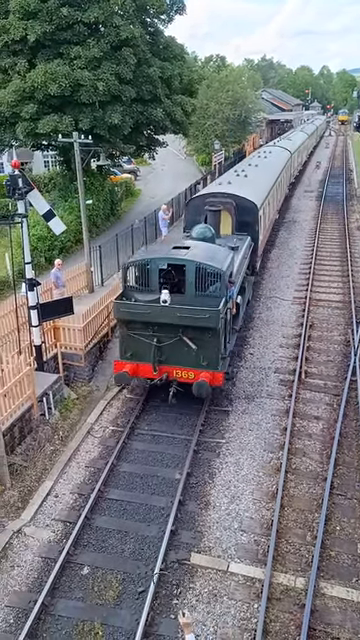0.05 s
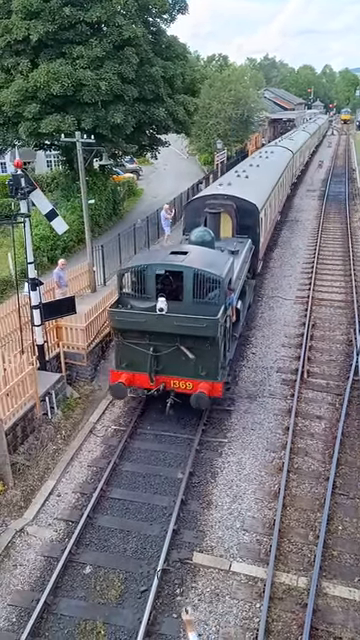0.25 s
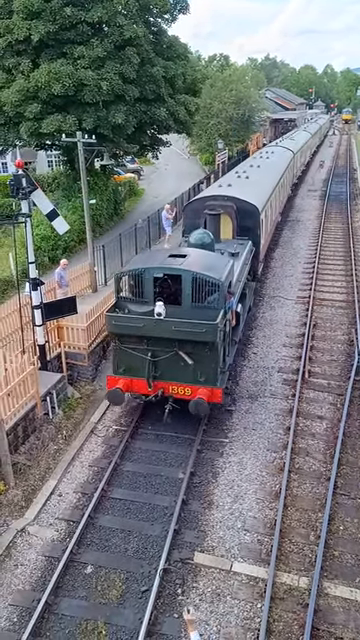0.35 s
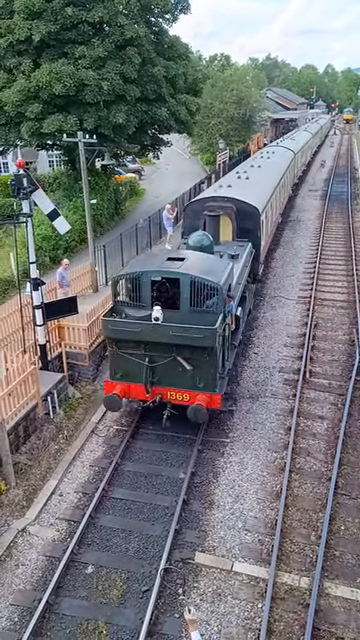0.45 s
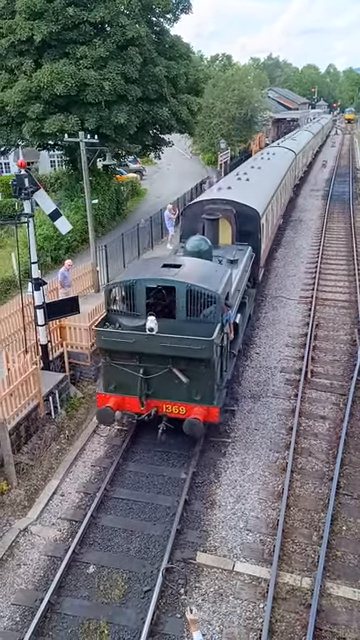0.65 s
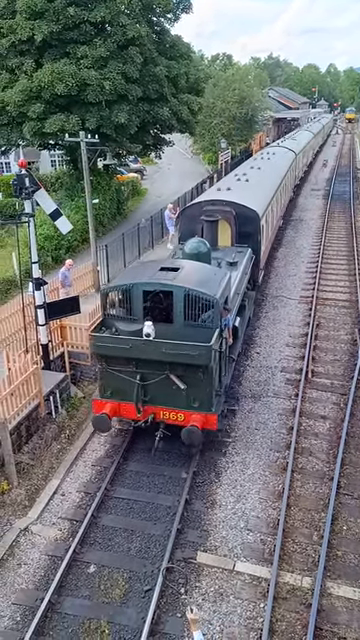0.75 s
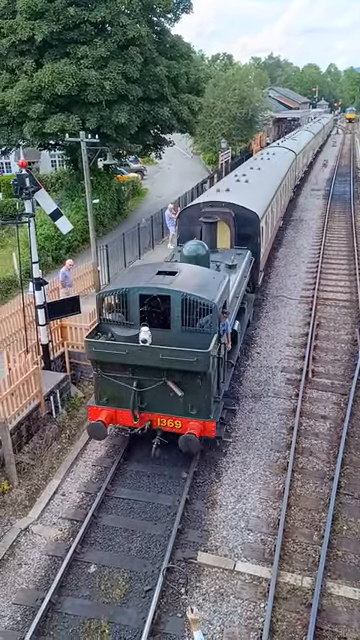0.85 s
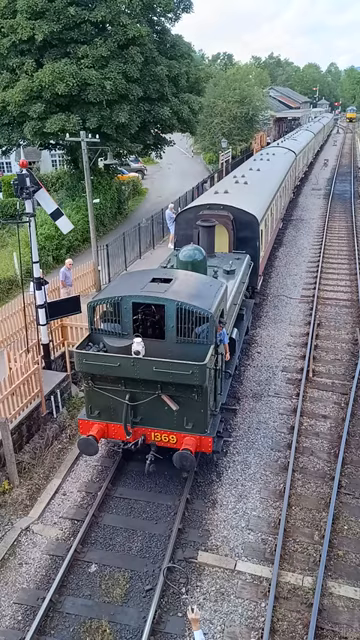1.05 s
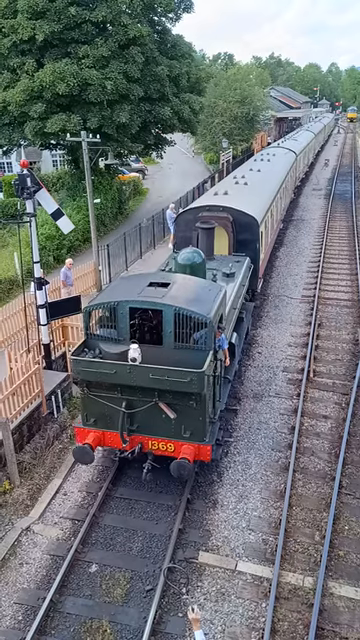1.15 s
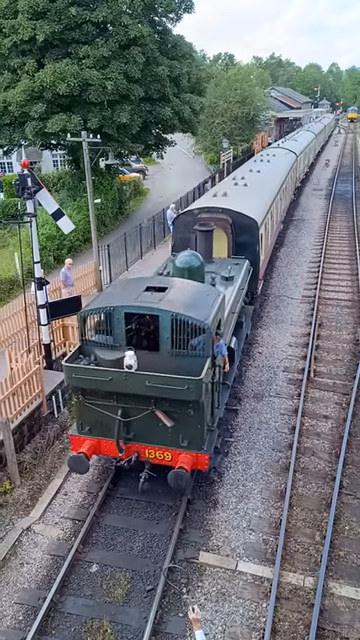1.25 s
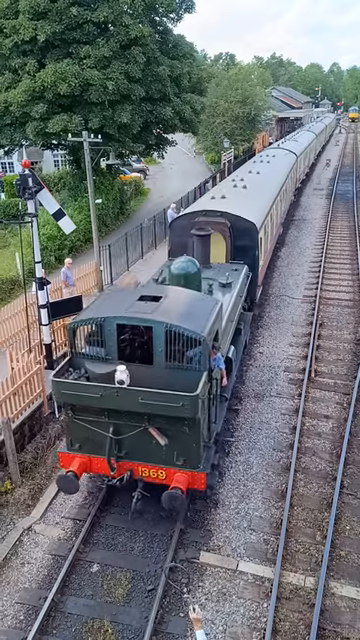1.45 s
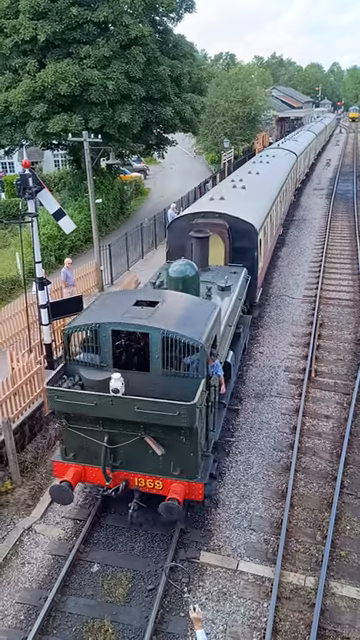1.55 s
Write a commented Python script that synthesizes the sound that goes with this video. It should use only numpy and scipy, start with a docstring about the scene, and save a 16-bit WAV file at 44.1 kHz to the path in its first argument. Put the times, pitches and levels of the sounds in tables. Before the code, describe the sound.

A steam locomotive pulls away with five quick, barking exhaust chuffs, each with a hiss and low boom; steam spits between them, a loose rod clinks, heard outdoors in stereo with slight wind on the microphone.

```python
"""A steam tank engine pulls coaches at about three exhaust chuffs a second, over a faint rumble and rail ringing.
First an earlier boom dies away, a loose rod clinks and a soft puff of wind is heard, mostly on the left.
Then come five chuffs: hoot and hiss, a bark and throb of shaped noise, and a low boom of wavering tones.
Steam leaks and spits between the chuffs, and the rod clinks again; echoes follow the steam sounds.
Near the end the rod clinks loudest, the motion squeaks once and a weaker puff of wind follows."""
import sys
import numpy as np
from scipy import signal
from scipy.fft import rfft, irfft, next_fast_len
from scipy.io import wavfile
from scipy.ndimage import uniform_filter1d, map_coordinates

SR = 44100
rng = np.random.default_rng(int(sys.argv[2]) if len(sys.argv) > 2 else 0)


def materialize(psi):
    """Save the field psi as 16-bit PCM at rate SR to the path in sys.argv[1].

    A 1-D psi becomes a single channel; in a 2-D psi each row is a channel.
    """
    bounded = np.clip(np.atleast_2d(psi).T, -1, 1)
    quanta = np.round(bounded * 32767).astype(np.int16)
    wavfile.write(sys.argv[1], SR, quanta)


N = 70560

# All spectra set the colour of a noise: (frequency [Hz], relative level per Hz [dB])
# Puffs of wind: (time [s], level [dB])
WIND_PUFFS = [(.138, -32), (1.202, -39.5)]
# Shape of a puff: (rise [s], hold [s], fall [dB/s]); then its spectrum
WIND_SHAPE = (0.053, 0.011, 590)
WIND_SPECTRUM = [(25, -40), (70, -8), (130, 6), (200, -13), (600, -72)]

# Spectrum of the rolling wheels
ROLLING_SPECTRUM = [(25, -27), (70, 4.5), (140, 1.5), (220, -5.5), (500, -5.5), (850, -4.5), (1400, -9.5),
                    (2200, -16), (5200, -33), (7000, -30.5), (10000, -39.5), (15500, -41)]
# Ringing of wheels and rails: (frequency [Hz], half-width [Hz], level [dB])
RAIL_MODES = [(4510, 17, -66.5), (4850, 130, -69.5), (5300, 110, -63.5), (5794, 82, -65.5),
              (8460, 260, -77), (9350, 430, -76.5)]
# Extra gain of that ringing over time: (time [s], level [dB])
RAIL_LEVEL = [(0, -9), (.5, -3), (0.762, 2), (1.1, 4.5), (1.42, -2.5), (1.6, -5.5)]

# Echo from trees and buildings: (frequency [Hz], time to fall by 60 dB [s])
ECHO_FADE = [(130, 0.59), (400, 0.24), (1000, 0.21), (4000, 0.22), (12000, 0.38)]
# Loudness of that echo: (frequency [Hz], level [dB])
ECHO_LEVEL = [(130, -21.5), (400, -18), (1000, -16), (4000, -9), (12000, -25.5)]

# Microphone pair: (frequency [Hz], left minus right [dB])
BALANCE = [(150, 2), (330, -2), (520, 11), (740, -4), (1000, 3), (1250, 11.5), (1470, 7.5), (1750, 0.5),
           (2000, 7.5), (2700, -0.5), (4200, 4), (5400, 8.5), (7500, 6), (10000, 12), (14000, 15)]
# How alike the two sides are: (frequency [Hz], likeness [0 to 1])
LIKENESS = [(150, 0.81), (400, 0.36), (1000, 1), (2800, 0.29), (4000, 0.49), (5600, 0.18), (10000, 0.083)]
# How late the left side is: (frequency [Hz], lag behind the right [ms])
LEFT_LAG = [(150, 0.63), (340, 0.2), (520, 1.185), (700, 0.76), (900, 1.43), (1300, 0.7), (1700, 0.85),
            (2600, 0.7), (5500, 0.618)]

# Knocks of a loose rod: (time [s], level added to the modes [dB])
CLINKS = [(.105, -23), (0.797, -13), (1.158, -2.5)]
# Shape of a knock: (rise [s], hold [s], fall [dB/s])
CLINK_SHAPE = (0.0059, 0.0047, 220)
# Ringing of a knock: (frequency [Hz], half-width [Hz], level [dB])
CLINK_MODES = [(2680, 115, -44.5), (3960, 450, -37.5), (4680, 110, -58), (5370, 180, -51),
               (6170, 430, -43.5), (8300, 1000, -53.5), (10800, 640, -55.5), (15020, 270, -57)]
# Squeak of the motion: (time [s], rise [s], hold [s], fall [dB/s])
SQUEAK_SHAPE = (1.166, 0.013, .042, 580)
# Ringing of the squeak: (frequency [Hz], half-width [Hz], level [dB])
SQUEAK_MODES = [(9200, 56, -38.5)]

# Steam bursts at the cylinders: (time [s], rise [s], hold [s], fall [dB/s],
# hiss level [dB], sizzle level [dB], thud level [dB])
STEAM_SPITS = [(0.336, 0.071, 0.035, 60, -40.5, -40.5, -47), (.464, 0.0094, 0.0046, 403, -25, -31.5, -36.5),
               (0.863, 0.0079, 0.014, 307, -38.5, -33, -25.5)]
# Spectra of the three parts of a burst
SPIT_HISS = [(400, -25), (1650, -8), (2300, 3), (4000, 6), (6000, -0.5), (8000, -20), (15000, -25)]
SPIT_SIZZLE = [(1500, -26), (5000, 3.5), (7500, 2), (12000, -2), (14000, -6), (15800, -15)]
SPIT_THUD = [(40, -29), (110, -10), (260, -12), (550, -4.5), (900, -29), (2000, -62), (6000, -70)]

# Short notes as the valves open: (time [s], frequency [Hz], size of pitch drift [Hz], level [dB])
HOOTS = [(0.203, 539.4, 45, -25), (0.211, 5360, 350, -31.5), (.563, 725.5, 40, -24.5),
         (0.583, 900, 35, -23.5), (0.873, 258.4, 25, -24.5), (.873, 610, 32, -26.5),
         (0.888, 5290, 440, -27.5), (1.241, 6064, 160, -29.5), (1.280, 298.5, 18, -15)]
# Shape of a hoot: (rise [s], hold [s], fall [dB/s])
HOOT_SHAPE = (0.012, 0.0065, 320)

# Exhaust beats: (time [s], rise of bark and throb [s], bark level [dB], hiss level [dB], hiss lead [s],
# throb level [dB], low boom level [dB], high boom level [dB], ring frequency [Hz], ring level [dB], ring hold [s])
CHUFFS = [(.240, 0.052, -19, -33.5, 0.031, -21, -18, -28, 134, -16, 0.093),
          (0.594, 0.04, -20.5, -33.5, 0.013, -21, -18, -16.5, 150, -29, 0.21),
          (0.919, 0.031, -19, -32.5, 0.033, -26.5, -20, -29.5, 134, -39.5, 0.11),
          (1.274, 0.049, -24.5, -31.5, 0.024, -20, -23, -26, 126, -31.5, .15),
          (1.627, 0.05, -22, -37.5, 0.024, -28.5, -38, -27, 135, -43, 0.07)]
# Boom already under way: (time [s], low level [dB], high level [dB], ring frequency [Hz],
# ring level [dB], ring hold [s])
EARLIER_BOOM = (-.01, -43, -52, 135, -38, .04)
# Shapes of the parts of a chuff: (hold [s], fall [dB/s])
BARK_SHAPE = (.026, 285)
HISS_SHAPE = (0.055, 520)
THROB_SHAPE = (0.05, 296)
BOOM_SHAPE = (.022, 280)
# Spectra of the noisy parts of a chuff
BARK_SPECTRUM = [(150, -23), (400, -1.5), (560, 0), (1050, -1.5), (1250, -9.5), (1650, -11.5),
                 (2800, -23.5), (4000, -25.5), (7000, -30.5), (15000, -63)]
THROB_SPECTRUM = [(25, -38), (45, -28), (75, -4.5), (125, -1), (200, -0.5), (320, -8), (480, -4),
                  (900, -24.5), (3000, -66)]
HISS_SPECTRUM = [(300, -78), (1500, 0), (2800, 5), (4000, -0.5), (5300, -0.5), (6500, -4.5), (8000, -16),
                 (11500, -12.5), (15500, -30)]
# Chimney and smokebox resonances: (frequency [Hz], width [Hz], lift, negative for a gap [dB])
CHIMNEY = [(274.3, 22, 7), (356.5, 15.6, 5.5), (509, 28, -0.5), (567.4, 30, 5), (618, 28, -7.5),
           (696.6, 32.6, 9.5), (824, 16, -1), (901, 20, 6.5), (1010, 19, 1), (1146, 43, 3), (1350, 21, 6.5),
           (1435, 17, 5.5), (1720, 41, -5.5), (1907, 150, 5), (2210, 51, -11), (2519, 44, 8.5),
           (2860, 43, 6)]

RISE_DB = 32.5  # climbed over one rise time
PATCHY_DB = 2.2  # unevenness of rushing noise from 1 kHz up, less below
ROLLING_DB, RAIL_FLICKER_DB = -51, 4
TAIL_DELAY_S = 0.049
WALL_DB, WALL_SPREAD_S = -18.5, 0.02  # reflections off the boiler, ballast and platform
JET_FLUTTER_DB, THUD_LATE_S = 0.9, 0.011
HISS_RISE_S, THROB_LATE_S, TURBULENCE_DB = 0.037, 0.001, 1.5
BOOM_LOW_HZ, BOOM_HIGH_HZ = 132.44, 160  # the two lowest modes of chimney and smokebox
BOOM_RISE_S, BOOM_LATE_S = 0.06, 0.016
BOOM_WANDER_RAD, BOOM_ROUGH_DB = 0.55, 1.8  # drift of phase and of level
RING_SAG_DB_PER_S, RING_STOP_DB_PER_S = 52, 600
TOP_HZ = 15850


def amp(db):
    """Turn decibels into gain."""
    return 10 ** (np.asarray(db) / 20)


def unit(x):
    """Scale to an average (rms) size of 1."""
    return x / np.sqrt(np.mean(x ** 2) + 1e-20)


def along(points, hz):
    """Read a value between (frequency, value) points, on a log frequency axis."""
    f, v = np.transpose(points)
    return np.interp(np.log(hz + 1), np.log(f + 1), v)


def clock():
    """Time of every sample in seconds."""
    return np.arange(N) / SR


def wobble(rate):
    """A smooth random curve through `rate` random points a second."""
    return map_coordinates(rng.standard_normal(4096), [clock() * rate], mode="wrap")


def filtered(x, response):
    """Change each frequency of x by the given response."""
    m = next_fast_len(N + SR // 2)  # spare room for delayed sound
    return irfft(rfft(x, m) * response(np.fft.rfftfreq(m, 1 / SR)), m)[..., :N]


def envelope(start, rise, hold, fall):
    """Swell up to the start time, hold, then fall at a steady rate in dB."""
    t = clock() - start
    swell_db = -RISE_DB * np.clip(-t / rise, 0, 6) ** 1.436
    fall_db = -fall * np.maximum(t - hold, 0)
    return amp(swell_db + fall_db)


def stereo_shares(hz):
    """Shares of common and opposite sound that give the two sides their likeness."""
    turn = np.arccos(np.clip(along(LIKENESS, hz), 0, 1)) / 2
    return np.array([np.cos(turn), np.sin(turn)])


def noise(gain):
    """Stereo noise of rms 1 with a given gain and likeness at each frequency."""
    mid, side = filtered(rng.standard_normal((2, N)), lambda hz: gain(hz) * stereo_shares(hz))
    return unit(np.array([mid + side, mid - side]))


def rush(spectrum, resonances=()):
    """Rushing noise in turbulent patches, lifted at any resonances."""
    def gain(hz):
        lift = sum(db * np.exp(-((hz - centre) / width) ** 2) for centre, width, db in resonances)
        return amp(along(spectrum, hz) + lift)

    hz, t, z = signal.stft(noise(gain), SR, nperseg=512)
    # random patches, smoothed over frequency and then over time
    patches = uniform_filter1d(rng.standard_normal(z.shape[1:]), size=3, axis=0)
    patches = unit(uniform_filter1d(patches, size=7, axis=1))
    depth_db = PATCHY_DB * np.minimum(hz / 1000, 1)[:, None]
    return unit(signal.istft(z * amp(depth_db * patches), nperseg=512)[1][:, :N])


def ringing(modes, flicker_db=0):
    """Steel modes kept sounding by friction, each a narrow band of noise."""
    out = np.zeros((2, N))
    for centre, width, db in modes:
        band = noise(lambda hz: 1 / (1 + ((hz - centre) / width) ** 2))
        out += amp(db + flicker_db * wobble(11.42)) * band
    return out


def wind():
    """Soft low puffs of noise, 20 dB weaker on the right."""
    puffs = sum(amp(db) * envelope(s, *WIND_SHAPE) for s, db in WIND_PUFFS)
    return puffs * rush(WIND_SPECTRUM) * amp([[0], [-20]])


def surroundings(x):
    """Trees and buildings return a diffuse tail, longest in the bass."""
    hz, t, z = signal.stft(rng.standard_normal((2, SR // 2)), SR, nperseg=256)
    t60 = np.maximum(along(ECHO_FADE, hz), 0.05)[:, None]
    common, opposite = stereo_shares(hz)[:, :, None] * z
    z = np.array([common + opposite, common - opposite])
    tail = signal.istft(z * 1000 ** (-t / t60), SR, nperseg=256)[1]
    wet = signal.fftconvolve(x, tail / np.linalg.norm(tail[0]), axes=1)[:, :N]
    return filtered(wet, lambda f: amp(along(ECHO_LEVEL, f)) * np.exp(-2j * np.pi * f * TAIL_DELAY_S))


def near_walls(x):
    """Weak early copies from surfaces too small to return the bass."""
    delays = rng.uniform(0.1, 1, (6, 2, 1)) * WALL_SPREAD_S  # six copies on each side

    def copies(hz):
        return hz / (hz + 400) * np.exp(-2j * np.pi * hz * delays).sum(axis=0)

    return amp(WALL_DB) * filtered(x, copies)


def rolling():
    """The wheels rumble as noise whose level drifts slightly."""
    return amp(ROLLING_DB + 0.48 * wobble(8.3)) * rush(ROLLING_SPECTRUM)


def singing_rails():
    """Wheels and rails ring faintly in narrow bands that flicker and change level."""
    return ringing(RAIL_MODES, RAIL_FLICKER_DB) * amp(np.interp(clock(), *np.transpose(RAIL_LEVEL)))


def rod_clinks():
    """Knocks of a loose rod sound its steel modes in short bursts."""
    knocks = sum(amp(db) * envelope(s, *CLINK_SHAPE) for s, db in CLINKS)
    return ringing(CLINK_MODES) * knocks


def squeak():
    """The motion squeaks once, as friction sounds a narrow high band."""
    return ringing(SQUEAK_MODES) * envelope(*SQUEAK_SHAPE)


def cylinders():
    """Steam escapes low down as rushing noise, in a long leak or a sharp spit, each with a thud."""
    out = np.zeros((2, N))
    for s, rise, hold, fall, hiss_db, sizzle_db, thud_db in STEAM_SPITS:
        jet = amp(hiss_db) * rush(SPIT_HISS) + amp(sizzle_db) * rush(SPIT_SIZZLE)
        out += jet * envelope(s, rise, hold, fall) * amp(JET_FLUTTER_DB * wobble(150))
        out += amp(thud_db) * rush(SPIT_THUD) * envelope(s + THUD_LATE_S, rise, hold, fall)
    return out


def hoots():
    """The first steam through a port sounds a short note of unsteady pitch."""
    out = np.zeros(N)
    for s, hz, drift_hz, db in HOOTS:
        pitch = hz + drift_hz * wobble(4 * drift_hz)
        note = np.sin(2 * np.pi * np.cumsum(pitch) / SR)
        out += amp(db) * note * envelope(s, *HOOT_SHAPE)
    return out


def boom(start, low_db, high_db, ring_hz, ring_db, ring_s):
    """Two air modes of the chimney beat unsteadily; another note rings on while steam still flows."""
    def tone(hz):
        return np.sin(2 * np.pi * (hz * clock() + rng.random()) + BOOM_WANDER_RAD * wobble(44.89))

    modes = amp(low_db) * tone(BOOM_LOW_HZ) + amp(high_db) * tone(BOOM_HIGH_HZ)
    blast = modes * envelope(start, BOOM_RISE_S, *BOOM_SHAPE)
    sag = amp(-RING_SAG_DB_PER_S * np.maximum(clock() - start, 0))
    ring = amp(ring_db) * sag * tone(ring_hz) * envelope(start, BOOM_RISE_S, ring_s, RING_STOP_DB_PER_S)
    return amp(BOOM_ROUGH_DB * wobble(55)) * (blast + ring)


def exhaust():
    """The valve opens with a hiss, then the turbulent blast barks, throbs and booms through the chimney."""
    out = np.zeros((2, N)) + boom(*EARLIER_BOOM)
    for s, rise, bark_db, hiss_db, lead, throb_db, *low_notes in CHUFFS:
        hiss = amp(hiss_db) * rush(HISS_SPECTRUM, CHIMNEY) * envelope(s - lead, HISS_RISE_S, *HISS_SHAPE)
        bark = amp(bark_db) * rush(BARK_SPECTRUM, CHIMNEY) * envelope(s, rise, *BARK_SHAPE)
        throb = amp(throb_db) * rush(THROB_SPECTRUM, CHIMNEY)
        throb = throb * envelope(s + THROB_LATE_S, rise, *THROB_SHAPE)
        blast = (bark + throb) * amp(TURBULENCE_DB * wobble(260))
        out += hiss + blast + boom(s + BOOM_LATE_S, *low_notes)
    return out


def microphones(x):
    """The left side hears the engine later, and mostly louder in the treble, than the right."""
    half = np.array([[0.5], [-0.5]])  # each side takes half of the difference

    def response(hz):
        gains = amp(half * along(BALANCE, hz))
        gains = gains / np.sqrt(np.mean(gains ** 2, axis=0))  # keep the power of the pair
        lag_s = along(LEFT_LAG, hz) / 1000
        return gains * np.exp(-2j * np.pi * hz * half * lag_s)

    return filtered(x, response)


def scene():
    """The engine with its echoes passes through the microphone pair; the wind is added after it."""
    steam = exhaust() + cylinders() + hoots()
    echoes = near_walls(steam) + surroundings(steam)
    running_gear = rolling() + singing_rails() + rod_clinks() + squeak()
    return microphones(steam + echoes + running_gear) + wind()


def record(dry):
    """Nothing is kept from the top frequency upwards."""
    return filtered(dry, lambda hz: hz < TOP_HZ)


dry = scene()
out = record(dry)
materialize(out)
```